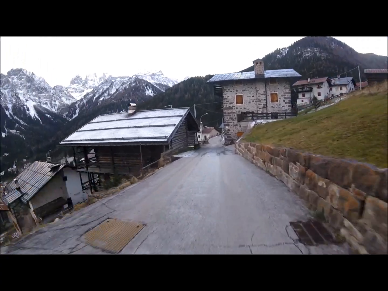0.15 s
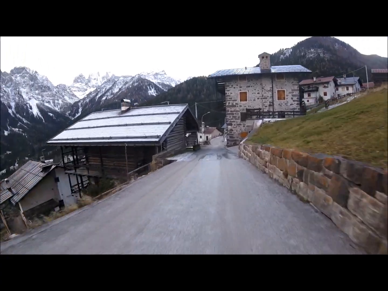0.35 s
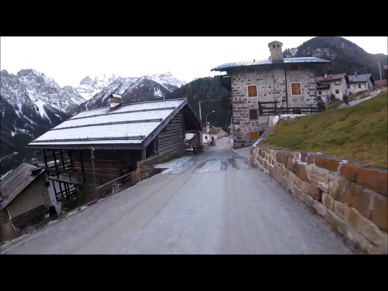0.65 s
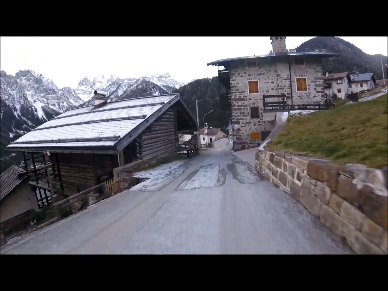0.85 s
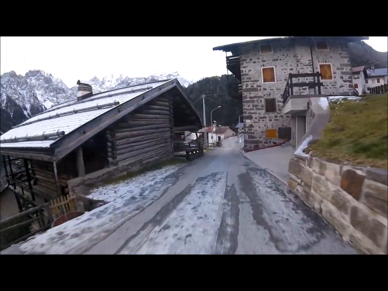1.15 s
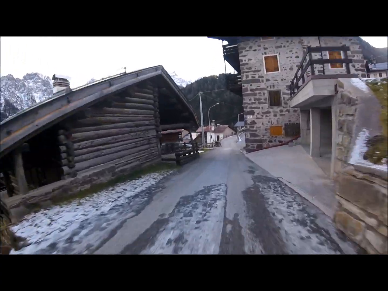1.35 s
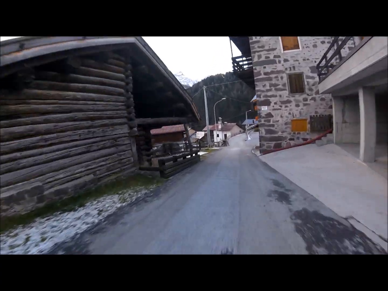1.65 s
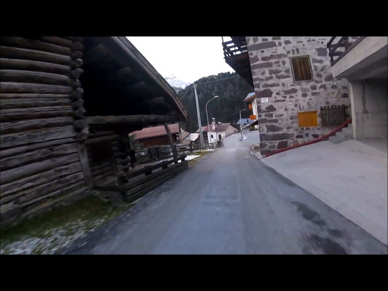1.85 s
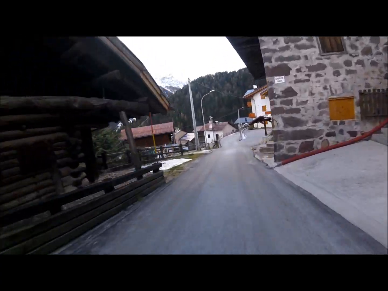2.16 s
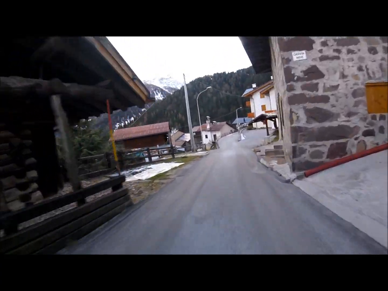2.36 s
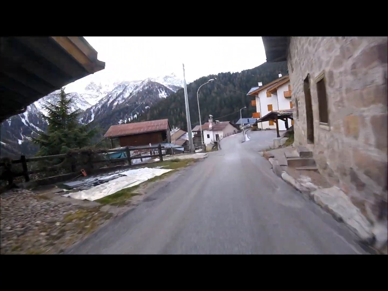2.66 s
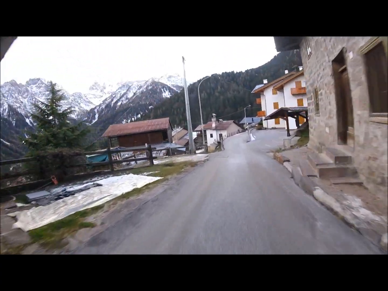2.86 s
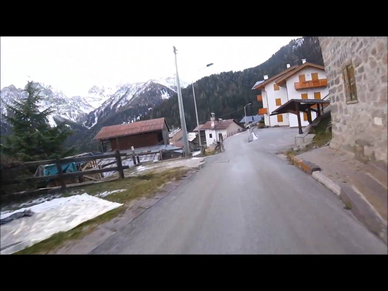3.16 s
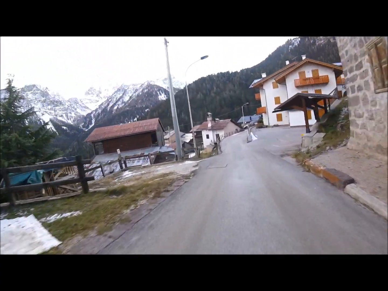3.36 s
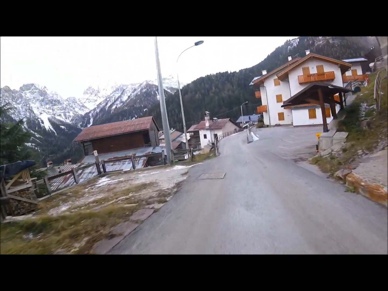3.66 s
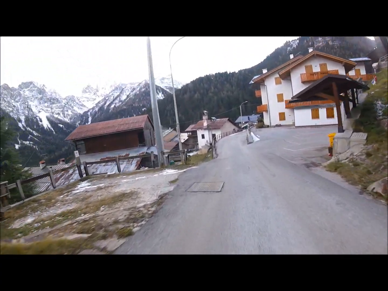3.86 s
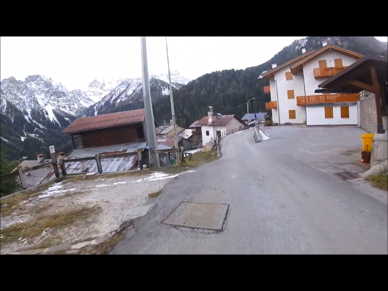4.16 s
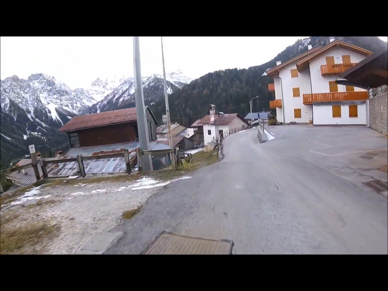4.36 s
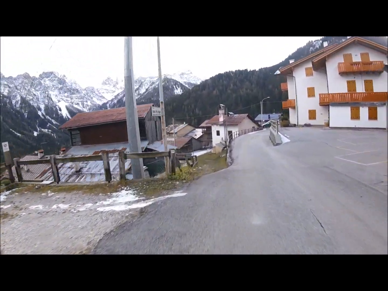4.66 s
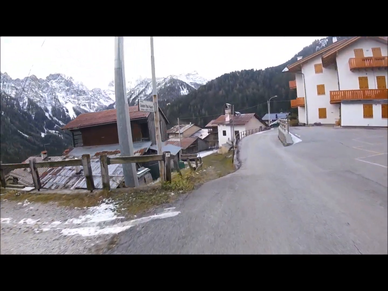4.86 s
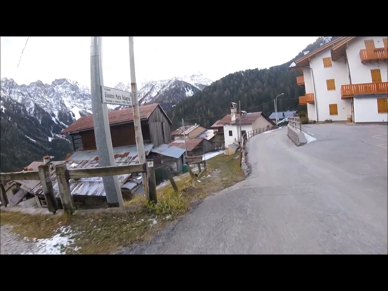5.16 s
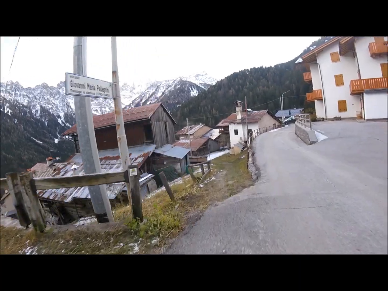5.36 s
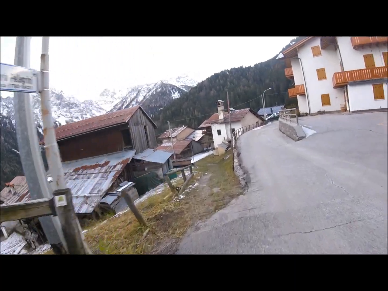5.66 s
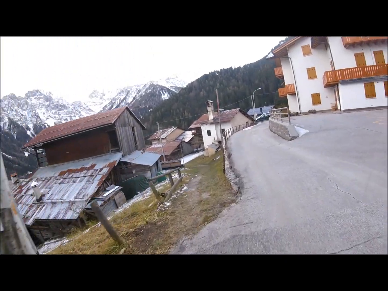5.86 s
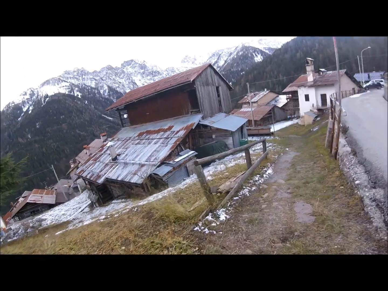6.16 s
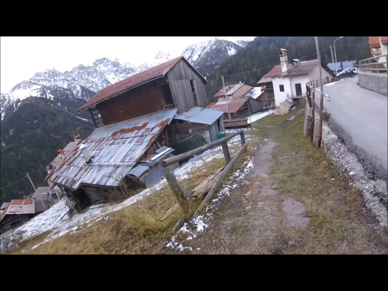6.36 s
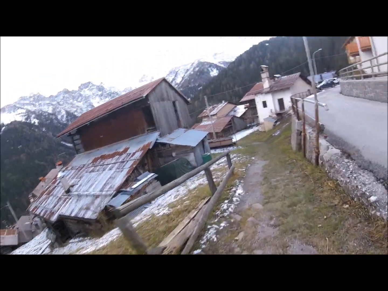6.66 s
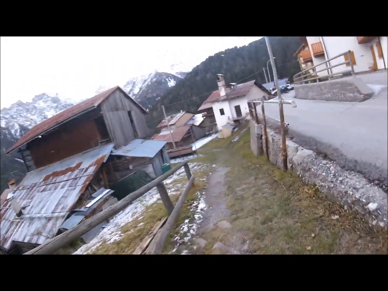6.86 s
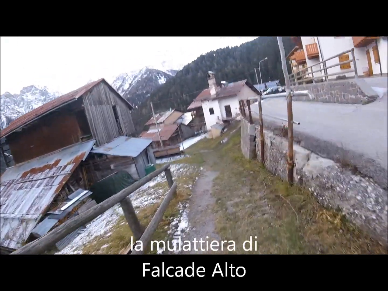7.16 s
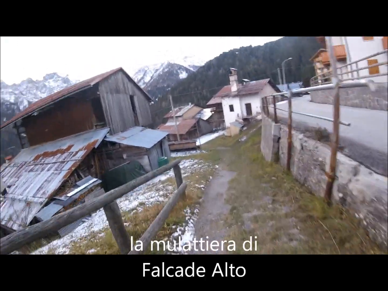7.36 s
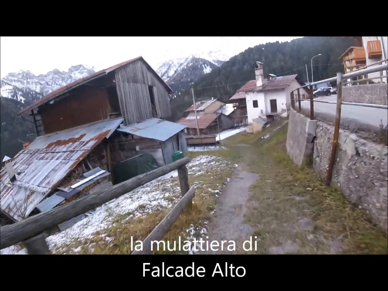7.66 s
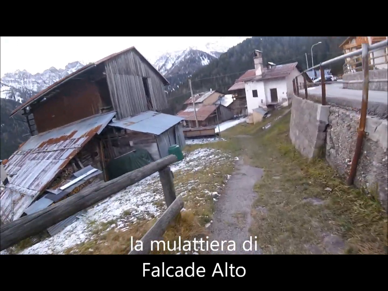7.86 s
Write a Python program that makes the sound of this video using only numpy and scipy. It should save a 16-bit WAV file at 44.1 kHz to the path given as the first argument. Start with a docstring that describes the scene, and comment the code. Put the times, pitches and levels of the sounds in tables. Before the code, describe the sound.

A microphone mounted on a fat bike catches everything close and dry outdoors. For the first two seconds the knobbly tyres hum at a nearly steady, wavering pitch over rattling, gritty rolling and low wind buffets. Around 1.4 to 1.75 s the hum softens briefly, with light knocks and a sharp crack at 1.5 s. A faint tubular ringing colours the drone from about 2.1 to 3.3 s. From 2.3 s the hum slides steadily lower as the bike slows. Stones snap and tick between 3.8 and 4.6 s, brighter near the end. Tiny high brake chirps come around 5 s, then a heavy cluster of thumps and clacks at 5.15 s. By 5.6 s the hum has faded. After 6.06 s tyres crunch softly over dirt, with a hard jolt at 6.4 s, smaller bumps at 7.2 to 7.35 s, another chirp at 7.6 s and light final rattles.

```python
"""Tread hum of a fat bike: two rows of blocks meet a village road, tones falling in pitch as it coasts and brakes.
Shaped noise and grains give the ground shaking the frame and camera case, then dirt crunching on a grassy track.
Decaying resonators thump at bumps; short noise bursts are knocks, clacks, clicks and snapping stones.
Narrow noise chirps like brake pads, wavering sines of fixed pitch sing in disc and tube,
low noise buffets the case as wind."""
import sys
import numpy as np
from scipy import signal
from scipy.fft import rfft, irfft
from scipy.io import wavfile
from scipy.ndimage import uniform_filter1d, minimum_filter1d

SR = 44100
rng = np.random.default_rng(int(sys.argv[2]) if len(sys.argv) > 2 else 0)


def inscribe(sig):
    """Save sig as 16-bit PCM at rate SR to the path in sys.argv[1].

    A 1-D sig is mono; a 2-D sig holds one channel per row.
    Samples are clipped to [-1, 1] before scaling.
    """
    pcm = np.round(np.clip(np.atleast_2d(sig).T, -1, 1) * 32767)
    wavfile.write(sys.argv[1], SR, pcm.astype(np.int16))


N = 352800
TIME_S = np.arange(N) / SR

# All *_COLOUR: relative spectral density [f/Hz, level/dB]; the noise is then scaled to rms 1.

# riding speed as the block rate of the centre row [t/s, f/Hz]
BLOCK_RATE = [(0.0, 289), (0.14, 297), (0.29, 275), (0.5, 305), (0.74, 279), (0.93, 293), (1.1, 275),
              (1.25, 285), (1.4, 280), (1.66, 297), (1.78, 299), (1.9, 281), (2.1, 283), (2.3, 275),
              (2.6, 255), (2.9, 238), (3.3, 225), (3.55, 213), (3.95, 187.5), (4.2, 169), (4.5, 155.4),
              (4.75, 148), (4.92, 138), (5.6, 95.5)]
COAST_HZ, SHOULDER_RATIO = 285, .725  # reference block rate; shoulder rate / centre rate
# load on the tread rows as the bike leans [t/s, centre level/dB, shoulder level/dB]
ROW_LOAD = [(0.04, -14.5, -24), (.35, -19, -27), (.58, -16, -33), (.75, -19, -27), (.88, -18, -15.5),
            (1.05, -17, -27), (1.77, -20.5, -24), (1.86, -12, -15), (1.97, -18.5, -12), (2.14, -15, -18),
            (2.22, -18.5, -11), (2.6, -12, -14), (2.8, -12.5, -15.5), (3.3, -11, -15.5), (3.45, -12.5, -21),
            (3.7, -13.5, -18), (3.92, -19, -23), (4.15, -19, -35), (4.55, -17, -23.5), (4.85, -21, -39),
            (5.05, -19, -24), (5.5, -28.5, -28.5)]
OCTAVE_DB, SUM_DB = -1, 3.5  # centre octave re centre tone; sum tone re shoulder tone
# resonance of tyre and frame with the main tread tones [f/Hz, level/dB]
TYRE_RESPONSE = [(90, -6.5), (130, -10), (165, -5.5), (188, -2.5), (205, 0), (226, -7), (256, -20),
                 (276, -7.5), (292, 0.5), (325, 3), (362, -0.5), (390, -29), (515, -30), (565, -13.5),
                 (610, -21.5)]
# weaker tread tones [multiple of block rate, level/dB]
OVERTONES = [(.89, -25.5), (1.09, -31.5), (1.45, -24.5), (2, -31), (2.175, -40.5), (2.93, -37.5),
             (3.01, -33), (3.625, -36.5), (4, -37), (4.302, -34), (5, -33.5)]
# frame response to the weaker tones [f/Hz, level/dB]
FRAME_RESPONSE = [(150, -6), (178, -12), (194, 5), (216, -7), (260, -1), (345, -2), (390, -8.5),
                  (470, -3.5), (600, -13.5), (670, 0.5), (715, 2.5), (770, -7), (1000, -23.5),
                  (1500, -17.5)]
# firmness of block slap, acting on the weaker tones [t/s, level/dB]
SLAP = [(0, 1.5), (2.4, 1), (3.2, 2.5), (4, -2.5), (4.8, -2.5), (4.92, 2.5), (5.05, -3), (5.3, -2),
        (6.1, -26)]
HUM_ROUGH, OVERTONE_ROUGH = .17, .55  # unevenness at COAST_HZ; HUM_ROUGH is for multiple 1
# soft ground hushing the main tones and case boom [start t/s, end t/s, hum level/dB, boom level/dB]
SOFT_GROUND = [(1.365, 1.749, -20, -4), (5.551, 8.5, -51, 0)]
GROUND_CHANGE_S = 0.11

# how hard the ground shakes the bike [t/s, level/dB]
SHAKE = [(0, 2), (.8, 2), (1.5, 0.5), (1.9, 1.5), (3.1, 1), (4.5, 1.5), (5.3, 3), (6.04, 3), (6.09, -4),
         (6.28, 1), (6.4, -4), (6.56, -5), (6.85, -1), (7.27, -1.5), (7.43, -8), (7.8, -4), (8, -7.5)]
# rolling bands before the case gain [level/dB at COAST_HZ and 0 dB shake, dB per dB speed, dB per dB shake]
DRONE_LAW = (-21, 1, 1.08)
BOOM_LAW = (-24.5, -0.36, 0.86)
RATTLE_LAW = (-32, 0.22, 1)
GRIT_LAW = (-41.5, 0.79, 0.93)
HISS_LAW = (-49, 0.54, 1)
# drone of the rolling tyres [f/Hz, level/dB]
DRONE_COLOUR = [(70, -17), (110, 2.5), (150, -3), (200, 9.5), (235, -3), (270, 0), (340, -26)]
# boom of the case [f/Hz, level/dB]
BOOM_COLOUR = [(200, -25.5), (260, -12), (295, 1.5), (325, 6.5), (355, 5.5), (385, -15.5), (430, -14),
               (490, -26.5), (600, -49.5)]
# rattle of the shaken bike [f/Hz, level/dB]
RATTLE_COLOUR = [(400, 4.5), (490, 3.5), (560, 1.5), (650, 5.5), (710, 5), (780, 0), (860, -3.5), (950, -3),
                 (1050, -15), (1400, -44)]
# grit under the tread [f/Hz, level/dB]
GRIT_COLOUR = [(800, -10.5), (1060, 2), (1250, 2.5), (1500, 4), (1680, 0), (1870, 0), (2200, -5),
               (2600, -9.5), (3200, -13.5), (4200, -18.5), (6000, -33)]
# rolling hiss [f/Hz, level/dB]
HISS_COLOUR = [(1900, -20.5), (2500, -11), (3100, -6), (3900, -15), (4600, -7), (5050, 1.5), (5500, 0.5),
               (6100, -2.5), (6450, 5), (7000, -6), (8000, -9.5), (9400, -13), (10000, -20.5), (10800, -34),
               (14000, -35.5)]
TRACK_START_S = 6.06
LUMP_DB, LUMPS_PER_S = 1.5, 14  # tufts and hollows of the track: spread and rate of boom lumps
# dirt crunching under the tread [f/Hz, level/dB]
CRUNCH_COLOUR = [(350, -8.5), (480, 3.5), (700, 11), (900, 5), (1150, -25.5), (1800, -14.5), (2600, -20),
                 (3400, -19.5), (4300, -24), (6500, -22.5), (9000, -35), (13000, -40)]
CRUNCH_DB, CRUNCH_GRAINS_PER_S, CRUNCH_CLUMP_DB = -39.5, 1500, 10  # level at 0 dB shake, before case gain
# narrow resonances of the camera case [f/Hz, bandwidth/Hz, added path level/dB]
CASE_PEAKS = [(717, 28, -7.5), (949, 9.8, -5.5), (1860, 53, -8), (2940, 80, -11), (5040, 77, -6.5),
              (5370, 100, -9.5), (5850, 90, -8), (6600, 47, -11), (6860, 70, -10), (7060, 80, -7)]

# wheel blows and rebounds [t/s, first-12-ms rms level/dB, tyre thump f/Hz]
BUMPS = [(1.534, -22, 330), (1.583, -20, 200), (5.141, -11.5, 285), (5.1555, -14, 280), (5.170, -18.5, 280),
         (5.202, -20, 205), (5.2165, -19, 205), (6.363, -21, 300), (6.4232, -8, 320), (6.4350, -9.5, 275),
         (6.4496, -20, 345), (6.560, -23, 330), (7.2175, -20, 345), (7.2262, -17, 345),
         (7.3285, -14.5, 285), (7.343, -13, 280), (7.3575, -23, 340), (7.780, -25, 330), (7.824, -23, 330)]
# ringing of frame and case [f/Hz, level/dB re thump, t60/s]
BODY_MODES = [(75, -19, .09), (295, -13, .08), (345, -3, .085), (425, -14, .06), (525, -17, .04),
              (700, -17, .03), (940, -20, .02)]
THUMP_T60_S = .06

# sharp knocks of the bike [t/s, nominal peak level/dB, decay/s]
KNOCKS = [(1.410, -26, .007), (1.453, -25, .005), (1.464, -26, .003), (1.5365, -9, .004),
          (1.541, -17, .003), (1.585, -22, .005), (5.149, -21, .009), (5.209, -27, .008),
          (6.423, -32, .005), (7.213, -33, .012), (7.327, -31, .008), (7.606, -40, .006),
          (7.757, -38.5, .012)]
# knock spectrum [f/Hz, level/dB]
KNOCK_COLOUR = [(300, -7), (600, 2), (950, 2), (1200, 6), (1450, 6.5), (1800, 1), (2300, -2), (2900, -6),
                (3900, -20), (6400, -35), (9500, -43), (12000, -66)]
# loose parts clacking [t/s, nominal peak level/dB, decay/s]
CLACKS = [(1.537, -13, .003), (1.586, -13, .005), (4.499, -18, .005), (5.148, -14, .005),
          (5.159, -12.5, .007), (5.202, -13, .008), (5.214, -15, .008), (6.4228, -7.5, .0035),
          (7.216, -20, .005), (7.330, -20, .009), (7.347, -23, .007), (7.680, -26, .012),
          (7.783, -28, .012)]
# clack spectrum [f/Hz, level/dB]
CLACK_COLOUR = [(300, -13), (430, 9.5), (560, 5.5), (780, 3.5), (950, 0), (1200, -23), (2200, -37),
                (4000, -36.5)]
# stones snapping out from under the tread [t/s, nominal peak level/dB, decay/s]
STONES = [(1.168, -20, .003), (1.572, -25, .002), (1.657, -26, .002), (1.665, -20.5, .0025),
          (3.819, -24, .004), (3.955, -22, .003), (4.076, -26, .003), (4.118, -24, .002),
          (4.193, -25, .003), (4.217, -25, .003), (4.377, -18.5, .0016), (4.389, -27, .004),
          (4.438, -25, .004), (4.447, -25, .003), (4.5215, -13.5, .0015), (4.5655, -14, .0015),
          (4.599, -20, .0014), (5.189, -25, .0025), (5.226, -26, .003), (5.259, -23, .0025),
          (5.283, -24, .002)]
# stone spectrum [f/Hz, level/dB]
STONE_COLOUR = [(400, 0), (950, 2.5), (1450, 7.5), (2300, 0), (3000, -10), (3900, -22.5), (6400, -34.5),
                (11000, -56.5)]
# gravelly verge with smaller stones [start t/s, end t/s]
VERGE_SPAN_S = (3.75, 5.7)
SMALL_STONE_DB, SMALL_STONE_DECAY_S = -31, 0.0013
SKITTER_S, SKITTER_LOSS_DB = 0.012, 15.5  # second, softer touch: delay scale, loss
# bright dry clicks [t/s, nominal peak level/dB, decay/s]
CLICKS = [(5.150, -29, .005), (6.061, -26.5, .001), (6.367, -32, .001), (7.296, -26, .001)]
# click spectrum [f/Hz, level/dB]
CLICK_COLOUR = [(300, 3), (1500, 0), (4000, -7), (6500, -8), (10000, -15), (14000, -21)]

# brake pads brushing the disc [t/s, level/dB, bell sigma/s]
CHIRPS = [(4.886, -65, 0.013), (4.954, -44, 0.011), (5.006, -42, 0.0076), (5.09, -49, .013),
          (5.25, -63, 0.018), (5.317, -61, 0.018), (5.685, -62, .015), (6.058, -62, 0.0045),
          (7.601, -43, 0.0065), (7.682, -58, 0.0064)]
# chirp spectrum [f/Hz, level/dB]
CHIRP_COLOUR = [(11700, -41), (12250, -27.5), (12480, -1), (12700, -29), (13200, -35)]
# faint disc singing as the pads drag [start t/s, end t/s, level/dB]
DISC_SONG = [(5.567, 5.92, -59), (6.948, 7.3, -63)]
# ringing frame tube [t/s, level/dB]
TUBE_RING = [(2.0, -50), (2.1, -26), (2.2, -33), (2.31, -20), (2.4, -20.5), (2.44, -38), (2.85, -35),
             (3.08, -46), (3.25, -30), (3.5, -50), (3.9, -85)]
DISC_HZ, TUBE_HZ = 2470, 551

# slowly changing airflow over the case [t/s, level/dB]
AIRFLOW = [(0, -21.5), (1.5, -22.5), (2.0, -21.5), (2.9, -26.5), (4.3, -23), (4.7, -26.5), (5.4, -18),
           (6.0, -28.5), (6.45, -24.5), (6.65, -32), (7.0, -27.5), (7.8, -28), (8, -20.5)]
# strongest buffets [t/s, peak level/dB, bell sigma/s]
GUSTS = [(.9, -16.5, 0.16), (1.2, -13.5, 0.03), (1.44, -13, 0.031), (1.59, -22, 0.018), (2.1, -22, 0.023),
         (2.74, -16, 0.039), (3.32, -23, 0.022), (3.63, -19.5, 0.032), (4.2, -21, 0.03),
         (4.51, -17.5, 0.028), (5.81, -21, 0.021), (6.19, -21, 0.11), (6.34, -22, 0.046),
         (6.83, -18, 0.051), (7.22, -21, 0.051), (7.36, -16, 0.033), (7.62, -25, 0.024), (7.78, -22, 0.096)]
# wind eddies [f/Hz, level/dB]
WIND_COLOUR = [(10, -18.5), (20, -3), (40, 1.5), (58, 0), (74, 6.5), (92, -5.5), (120, -18.5), (200, -21.5)]
# small eddies that grow with speed [f/Hz, level/dB]
FLUTTER_COLOUR = [(70, -19), (105, 3), (128, -3), (170, -12.5), (260, -22)]
FLUTTER_DB = -12.5  # re main eddies, at COAST_HZ

CUTOFF_HZ = 15000


def tread_hum():
    """Block-rate tones of two rows swell as the falling speed sweeps them through resonances."""
    block_hz = in_time(BLOCK_RATE)[0]
    slap = from_db(in_time(SLAP)[0])
    centre_db, shoulder_db = in_time(ROW_LOAD)
    blocks = np.cumsum(block_hz) / SR
    unsteady = COAST_HZ / block_hz  # a slower tyre hums less evenly
    main_tones = [
        (1, centre_db),
        (2, centre_db + OCTAVE_DB),
        (SHOULDER_RATIO, shoulder_db),
        (1 + SHOULDER_RATIO, shoulder_db + SUM_DB),
    ]
    strong = np.zeros(N)
    for multiple, level_db in main_tones:
        gain = from_db(level_db + at_hz(TYRE_RESPONSE, multiple * block_hz))
        rough = HUM_ROUGH * multiple * unsteady ** 1.43
        strong += gain * tone(multiple * blocks, rough, rate_hz=31)
    weak = np.zeros(N)
    for multiple, level_db in OVERTONES:
        gain = from_db(level_db + at_hz(FRAME_RESPONSE, multiple * block_hz))
        # uneven block timing blurs higher tones more
        weak += gain * tone(multiple * blocks, OVERTONE_ROUGH * unsteady, rate_hz=9 * multiple)
    return softness()[0] * strong + slap * weak


def softness():
    """Gains of main hum tones and case boom as the tyres cross slush and grass."""
    return from_db(sum(np.outer(levels_db, during(start, end, GROUND_CHANGE_S))
                       for start, end, *levels_db in SOFT_GROUND))


def rolling():
    """Ground texture shakes tyres, frame and case; grit crackles under the tread."""
    speed_db = 20 * np.log10(in_time(BLOCK_RATE)[0] / COAST_HZ)
    shake_db = in_time(SHAKE)[0]
    drone, boom, rattle, grit, hiss = [
        from_db(level_db + by_speed * speed_db + by_shake * shake_db)
        for level_db, by_speed, by_shake in (DRONE_LAW, BOOM_LAW, RATTLE_LAW, GRIT_LAW, HISS_LAW)]

    grain_db = 3.6 * np.minimum(rng.exponential(1, N), 4)
    grains = (rng.random(N) < 900 / SR) * rng.standard_normal(N) * from_db(grain_db)
    grit_bed = rough_noise(GRIT_COLOUR, patchy_db=1.0, rate_hz=46)
    crackle = rms_one(grit_bed + 0.44 * coloured(GRIT_COLOUR, grains))

    on_track = TIME_S > TRACK_START_S
    jolts = from_db(0.5 * drift(3.3) + 0.6 * on_track * drift(30))  # shared by rattle and grit
    lumps = from_db(LUMP_DB * on_track * drift(LUMPS_PER_S))
    low = drone * evened(rough_noise(DRONE_COLOUR, patchy_db=2.0, rate_hz=9.3), span_s=0.34)
    boom_noise = evened(rough_noise(BOOM_COLOUR, patchy_db=1.5, rate_hz=5.9), span_s=0.46)
    low += softness()[1] * lumps * boom * boom_noise
    high = rattle * rough_noise(RATTLE_COLOUR, patchy_db=1.0, rate_hz=54) + grit * crackle
    return low + jolts * high + hiss * rough_noise(HISS_COLOUR, patchy_db=0.95, rate_hz=69)


def crunch():
    """On the track, dirt gives way under the tread in clumps of small grains."""
    clumps = from_db(CRUNCH_CLUMP_DB * np.minimum(drift(22), 1))
    grains = (rng.random(N) < CRUNCH_GRAINS_PER_S / SR) * rng.standard_normal(N) * clumps
    level = from_db(CRUNCH_DB + in_time(SHAKE)[0]) * (TIME_S > TRACK_START_S)
    return level * coloured(CRUNCH_COLOUR, grains)


def through_case(x):
    """Parallel narrow resonances of the case add to the ground noise."""
    out = x.copy()
    for hz, width_hz, level_db in CASE_PEAKS:
        r = np.exp(-np.pi * width_hz / SR)
        poles = [1, -2 * r * np.cos(2 * np.pi * hz / SR), r * r]
        out += from_db(level_db) * (1 - r * r) / 2 * signal.lfilter([1, 0, -1], poles, x)
    return out


def bumps():
    """Each blunt blow or rebound thumps the tyre at its own pitch and rings frame and case."""
    shudder, shudder_s, contact_hz, first_cycles_s = .15, .006, 480, .012
    out, after_s = np.zeros(N), TIME_S[:SR // 4]
    soft = signal.butter(2, contact_hz, fs=SR, output="sos")
    for s, level_db, thump_hz in BUMPS:
        force = rng.standard_normal(len(after_s)) * after_s * np.exp(-after_s / shudder_s)
        force *= shudder / np.linalg.norm(force)
        force[0] += 1  # the blow itself
        blunt = signal.sosfilt(soft, force)
        thud = ring(blunt, thump_hz, THUMP_T60_S)
        for hz, mode_db, t60_s in BODY_MODES:
            thud += from_db(mode_db) * ring(blunt, hz, t60_s)
        at = round(s * SR)
        first_rms = thud[after_s < first_cycles_s].std()
        out[at:at + len(thud)] += from_db(level_db) * thud[:N - at] / first_rms
    return out


def knocks(count=28):
    """Short noise bursts: knocks and clacks of the bike, snapping and skittering stones; also bright dry clicks."""
    small = [(rng.uniform(*VERGE_SPAN_S), SMALL_STONE_DB, SMALL_STONE_DECAY_S) for _ in range(count)]
    skitter = [(s + SKITTER_S * rng.uniform(0.46, 2.7), level_db - SKITTER_LOSS_DB, decay_s)
               for s, level_db, decay_s in STONES]
    bike = short_bursts(KNOCKS, KNOCK_COLOUR) + short_bursts(CLACKS, CLACK_COLOUR)
    stones = short_bursts(STONES + skitter + small, STONE_COLOUR)
    return bike + stones + short_bursts(CLICKS, CLICK_COLOUR)


def metal():
    """Brake pads excite narrow-band chirps and a singing disc; a frame tube rings at fixed pitch."""
    squeak = evened(coloured(CHIRP_COLOUR, rng.standard_normal(N)), span_s=0.018)
    chirps = swells(CHIRPS) * squeak
    dragging = sum(from_db(level_db) * during(start, end, fade_s=.08) for start, end, level_db in DISC_SONG)
    song = dragging * tone(DISC_HZ * TIME_S, rough=0.46, rate_hz=15)
    tube = from_db(in_time(TUBE_RING)[0]) * tone(TUBE_HZ * TIME_S, rough=0.24, rate_hz=8)
    return chirps + song + tube


def wind():
    """Eddies buffet the case in slowly changing flow and gusts; the share of small eddies grows with speed."""
    flow = from_db(in_time(AIRFLOW)[0])
    speed = in_time(BLOCK_RATE)[0] / COAST_HZ
    flutter = from_db(FLUTTER_DB) * speed ** 2 * rough_noise(FLUTTER_COLOUR, patchy_db=0.0, rate_hz=6.4)
    eddies = rough_noise(WIND_COLOUR, patchy_db=1.5, rate_hz=15) + flutter
    return np.hypot(flow, swells(GUSTS)) * evened(eddies, span_s=0.11)


def short_bursts(rows, colour, rise_s=0.00029):
    """Noise bursts that rise at once and die away within milliseconds."""
    strength, after_s = np.zeros(N), TIME_S[:SR // 10]
    for s, level_db, decay_s in rows:
        at = round(s * SR)
        fall = np.exp(-after_s / decay_s) * (1 - np.exp(-(after_s / rise_s) ** 2))
        strength[at:at + len(fall)] += from_db(level_db) * fall / fall.max()
    noise = evened(coloured(colour, rng.standard_normal(N)), span_s=0.0045)
    return strength * noise / 2  # noise peaks reach about twice the rms


def ring(force, hz, t60_s):
    """Two-pole resonator: a unit click starts a decaying sine of height 1."""
    r, w = from_db(-60 / (t60_s * SR)), 2 * np.pi * hz / SR
    return signal.lfilter([0, np.sin(w)], [1, -2 * r * np.cos(w), r * r], force + 1e-18)


def tone(cycles, rough, rate_hz):
    """Sine of rms 1 whose strength and phase wander."""
    phase = (2 * np.pi * (cycles % 1)).astype(np.float32)
    in_phase = (1 + rough * drift(rate_hz)) * np.cos(phase)
    quadrature = rough * drift(rate_hz) * np.sin(phase)
    return rms_one(in_phase - quadrature)


def rough_noise(colour, patchy_db, rate_hz):
    """Noise arriving in uneven surges, through a body's response."""
    return coloured(colour, rng.standard_normal(N) * from_db(patchy_db * drift(rate_hz)))


def coloured(colour, x):
    """Give an excitation a spectrum; rms 1."""
    hz = np.arange(N // 2 + 1) * SR / N
    return rms_one(irfft(rfft(x) * from_db(at_hz(colour, hz)), N))


def drift(rate_hz):
    """Slow random curve of rms 1, about rate_hz changes a second."""
    step = 20  # samples per point
    size = N // step
    hz = np.arange(size // 2 + 1) * SR / N
    slow = irfft(rfft(rng.standard_normal(size)) / (1 + (hz / rate_hz) ** 2) ** 2, size)
    return np.interp(np.arange(N) / step, np.arange(size), rms_one(slow))


def evened(x, span_s):
    """Level out slow power changes with a twice-smoothed running power."""
    size = max(int(span_s * SR * .75), 1)
    power = uniform_filter1d(uniform_filter1d(x ** 2, size), size)
    return x / np.sqrt(power + 0.11)  # floor limits the lift


def swells(rows):
    """Sum of bell-shaped rises and falls, one a row."""
    out = np.zeros(N)
    for s, level_db, sigma_s in rows:
        near = abs(TIME_S - s) < 5 * sigma_s
        out[near] += from_db(level_db) * np.exp(-.5 * ((TIME_S[near] - s) / sigma_s) ** 2)
    return out


def during(start, end, fade_s):
    """One between two times, zero outside, with sloping edges."""
    return np.clip(np.minimum(TIME_S - start, end - TIME_S) / fade_s + .5, 0, 1)


def in_time(rows):
    """Each column of a curve at every sample."""
    s, *columns = np.transpose(rows)
    return [np.interp(TIME_S, s, c) for c in columns]


def at_hz(points, hz):
    """Read a spectrum in dB on a log-frequency axis."""
    f, db = np.transpose(points)
    return np.interp(np.log(hz + 1e-3), np.log(f), db, left=-100, right=-100)


def from_db(db):
    """Decibels to gain."""
    return 10 ** (np.asarray(db) / 20)


def rms_one(x):
    """Scale to unit power."""
    return x / np.sqrt(np.mean(x ** 2) + 1e-20)


def scene(case_db=-1.0):
    """Sum of all sources at one microphone riding with the bike."""
    ground = from_db(case_db) * through_case(rolling() + crunch())
    return (tread_hum() + ground + bumps() + knocks() + metal() + wind())[None]


def record(dry):
    """A fast limiter holds down the highest peaks; a low-pass cuts the top."""
    ceiling, size = .8, SR // 400
    gain = minimum_filter1d(ceiling / np.maximum(abs(dry), ceiling), 2 * size)
    limited = dry * uniform_filter1d(uniform_filter1d(gain, size), size)
    return signal.sosfilt(signal.cheby2(12, 70, CUTOFF_HZ, fs=SR, output="sos"), limited)


dry = scene()
out = record(dry)
inscribe(out)
```